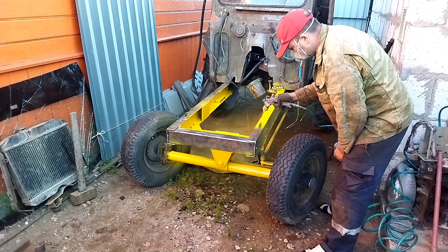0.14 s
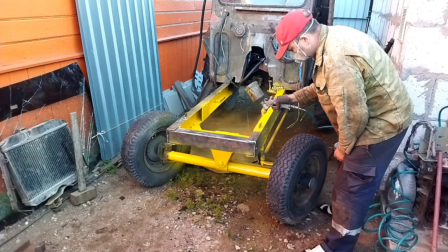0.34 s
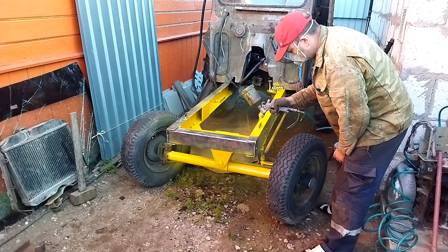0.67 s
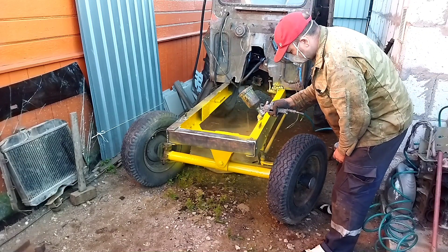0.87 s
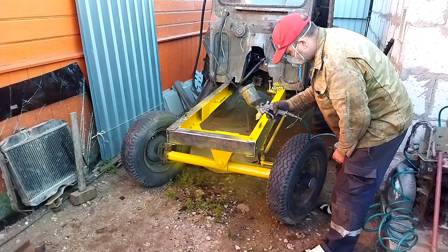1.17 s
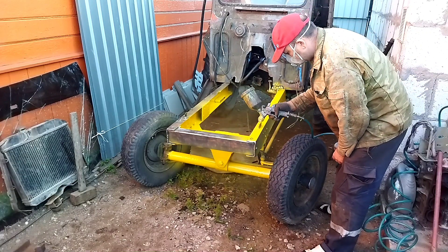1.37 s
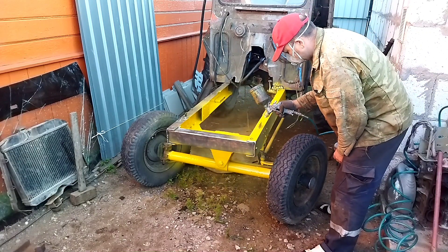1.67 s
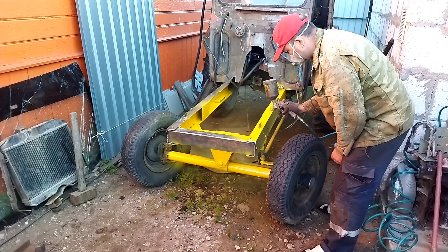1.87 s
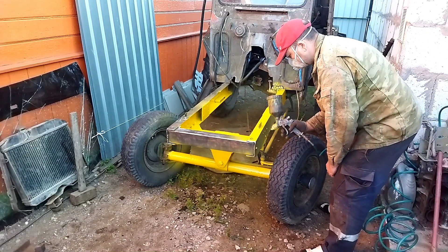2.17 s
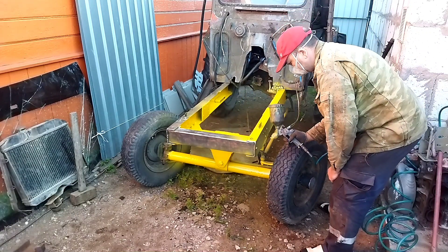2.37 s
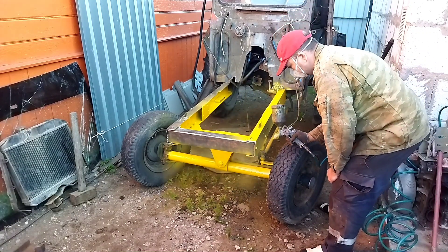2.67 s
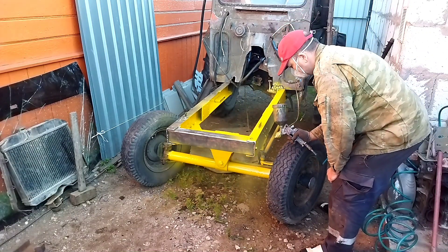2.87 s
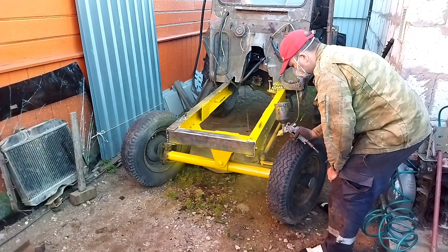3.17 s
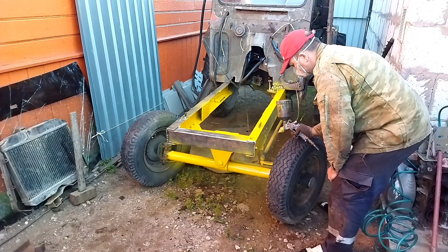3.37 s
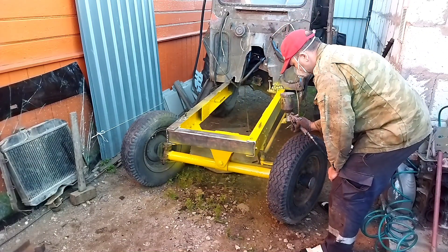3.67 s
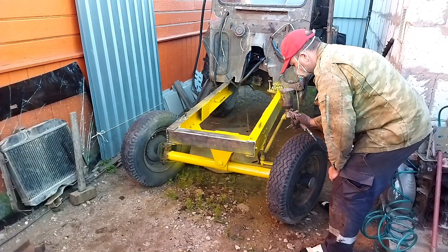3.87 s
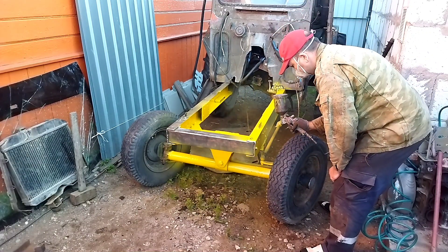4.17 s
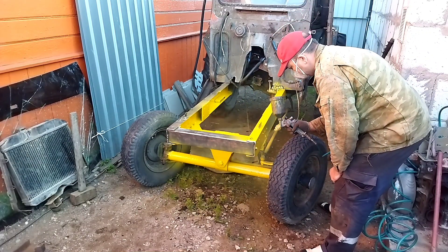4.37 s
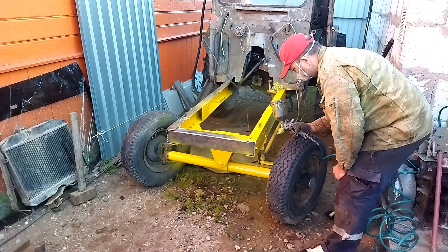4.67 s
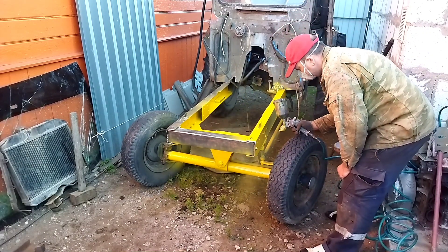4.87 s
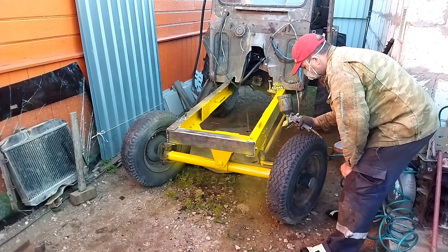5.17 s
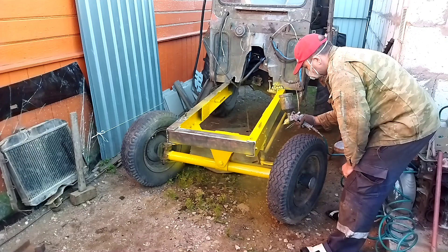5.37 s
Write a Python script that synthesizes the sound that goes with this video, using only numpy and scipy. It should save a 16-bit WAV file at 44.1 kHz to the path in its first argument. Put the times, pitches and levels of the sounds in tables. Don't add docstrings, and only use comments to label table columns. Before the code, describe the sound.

A paint spray gun hisses in sharp on-off bursts against a hollow steel frame, while a piston compressor jolts on and hums beneath.

```python
import sys
import numpy as np
from scipy import signal
from scipy.fft import rfft, irfft, dct, next_fast_len
from scipy.io import wavfile
from scipy.ndimage import uniform_filter1d, map_coordinates

SR = 44100
rng = np.random.default_rng(int(sys.argv[2]) if len(sys.argv) > 2 else 0)


def transcribe(signal):
    frames = np.atleast_2d(signal).T
    limited = np.clip(frames, -1, 1)
    pcm = np.round(limited * 32767).astype(np.int16)
    wavfile.write(sys.argv[1], SR, pcm)


def natural_amplitude(level_db):
    exponent = np.asarray(level_db, float) / 20
    return 10 ** exponent


N = 243873
RUN_HZ = 45.17

# open t/s, shut t/s, snap/0-1, settled flow level/dB, extra level at opening/dB
TRIGGER_PULLS = [
    (-1, 1.133, 1, -22.4, 0),
    (1.326, 1.856, .8, -23.3, 4),
    (2.316, 3.7, 1, -24.8, 5.7),
    (3.863, 4.453, .85, -19, -5.3),
    (4.627, 7, 1, -25.5, 7),
]
# t/s, aim level/dB
FRAME_AIM = [(0, 3), (.3, -3), (.65, 3.5), (1.0, 2.5), (1.12, -5), (1.38, -13), (1.45, -1), (1.68, 4),
             (1.86, 4), (2.4, -3), (5.53, -3)]
# f/Hz, level per Hz/dB
NOZZLE_FIZZ = [(6000, -60), (7000, -24), (8000, -14), (9000, -3.5), (11000, -4), (11350, -9), (11550, -9),
               (11700, 1), (12500, -1), (14500, -3), (15600, 0), (15800, -3), (16200, -60)]
# f/Hz, level per Hz/dB
JET_BODY = [(300, -30), (800, -12), (1300, -7.3), (2000, -5.2), (2600, -5.2), (3300, -1.5), (4500, -2),
            (5600, -1), (6800, 1), (7200, -3), (8000, -1), (9000, -30)]
# f/Hz, level per Hz/dB
STEEL_FRAME = [(24, -63), (40, -33), (97, -11), (162, -10), (271, 0), (314, -7), (374, -1), (1000, -5),
               (1300, -35), (2200, -120)]
# f/Hz, likeness/-1 to 1
JET_ALIKE = [(100, .9), (600, .3), (1200, .05), (1700, .55), (3500, .35), (5500, .42), (7500, .15),
             (9500, .52), (15000, .55)]
# f/Hz, lag/rad
JET_LAG = [(100, 0), (1700, .6), (3300, 1.6), (4800, 2.9), (7000, 3.1), (7900, 0), (16000, 0)]
# f/Hz, level/dB
JET_PAN = [(300, -1), (2000, 0), (5000, 2.6), (8000, 2.5), (15000, .6)]
# t/s, shaft f/Hz, load level/dB
SHAFT_RUN_UP = [
    (1.95, 22, -26),
    (2.05, 31, -17),
    (2.13, 40, -15),
    (2.18, 44, -6),
    (2.27, 46.8, -2),
    (2.34, 45.5, -2),
    (2.42, 45.15, 0),
    (5.53, 45.18, 0),
]
# multiple of shaft speed/1, level/dB, left minus right level/dB, left lag/rad
STROKE_TONES = [(1.0, -85.0, -1.0, 0.1), (2.0, -61.0, 0.0, 0.0), (3.0, -69.0, 2.0, -0.1),
                (4.0, -58.0, 0.0, 0.1), (5.0, -54.0, -1.0, 1.3), (6.0, -61.0, 0.0, 0.2),
                (7.0, -49.0, -2.0, 1.7), (8.0, -47.0, 0.0, 0.7), (9.0, -54.0, 4.0, 0.9),
                (10.0, -56.0, -10.0, 2.0), (11.0, -64.0, -9.0, 1.1), (12.0, -51.0, 6.0, 2.5),
                (13.0, -50.0, -8.0, 2.0), (14.0, -60.0, 0.0, 2.3), (15.0, -63.0, -4.0, 1.8),
                (16.0, -66.0, -4.0, 3.3), (17.0, -59.0, -11.0, 3.1), (18.0, -58.0, -7.0, 0.2),
                (19.0, -72.0, -4.0, 1.5), (20.0, -68.0, -2.0, 1.7), (32.0, -63.0, -1.0, 5.2),
                (40.0, -59.0, -2.0, 0.3)]
# f/Hz, level per Hz/dB
VALVE_CLATTER = [(30, -24), (70, -14), (150, -3), (400, 0), (800, -7), (1100, -11), (1400, -8), (1800, -8),
                 (2700, -18), (4000, -19), (5500, -24), (15000, -28), (15700, -36)]
# t/s, level/dB, f/Hz, time to fall 60 dB/s
RUN_UP_TONES = [(2.04, -51, 600, .08), (2.05, -52, 700, .07), (2.058, -50, 410, .07),
                (2.088, -52, 420, .06), (2.105, -56, 820, .07), (2.13, -47, 612, .15),
                (2.14, -46, 524, .8), (2.145, -47, 420, .4), (2.215, -43, 395, .2), (2.29, -47, 560, .15),
                (2.26, -45, 405, .2)]
# f/Hz, time to fall 60 dB/s
WALL_RINGING = [(200, .35), (2000, .33), (10000, .29)]
# f/Hz, level per Hz/dB
YARD_NOISE = [(30, -40), (80, -11), (140, -2), (270, 0), (600, -7.5), (1500, -10.5), (4000, -15),
              (6000, -19), (12000, -18), (14500, -21), (15700, -32)]
# f/Hz, rounding step over band level/dB
PHONE_COARSENESS = [(300, -12), (1500, -1), (3000, 6.8), (4200, 8), (5000, 9.4), (6000, 8.2), (7200, 9.2),
                    (8700, 6.3), (9500, 9), (15700, 9.5)]


def gun():
    usual_db, muffle = -22, .25
    fizz_db = flow() + .35 * wobble(7)
    aim_db, = curves(FRAME_AIM)
    body_db = -36.9 + .5 * (fizz_db - usual_db) - muffle * aim_db - .6 * np.arange(N) / SR
    drum_db = -51 + aim_db + 1.5 * wobble(25)
    flutter_db = .7 * wobble(18) + .6 * wobble(90) + .9 * wobble(500)

    fizz = natural_amplitude(fizz_db + 3.3 + flutter_db) * valve(1500, 320)
    fizz = fizz * rush(NOZZLE_FIZZ, JET_ALIKE, patchy_db=1.5)
    body = natural_amplitude(body_db + 5 + .7 * flutter_db) * valve(1150, 370)
    body = body * rush(JET_BODY, JET_ALIKE, patchy_db=1.5)
    drum = natural_amplitude(drum_db) * valve(600, 500)
    drum = drum * rush(STEEL_FRAME + [(1600, -60)], JET_ALIKE, patchy_db=2.5)
    return filtered(fizz + body + drum, lambda hz: ports(along(JET_PAN, hz), along(JET_LAG, hz)))


def flow():
    t = np.arange(N) / SR
    settle_s = .55
    opened, _, _, settled_db, surge_db = np.transpose(TRIGGER_PULLS)
    pull = np.searchsorted(opened[1:] - .05, t)
    since = np.maximum(t - opened[pull], 0)
    return settled_db[pull] + surge_db[pull] * np.exp(-since / settle_s)


def valve(open_db_s, shut_db_s):
    t = np.arange(N) / SR
    crack_db, steeper = -25, 5
    pulls = []
    for opened, shut, snap, *_ in TRIGGER_PULLS:
        rise_db = snap * open_db_s * (t - opened)
        rise_db = rise_db + steeper * np.minimum(rise_db - crack_db, 0)
        bleed_db = shut_db_s * (shut - t)
        pulls.append(np.minimum(0, np.minimum(rise_db, bleed_db)))
    return natural_amplitude(np.max(pulls, axis=0))


def compressor():
    switch_s, whine_grows_s = 2.05, .28
    shaft_hz, load_db = curves(SHAFT_RUN_UP)
    turns = np.cumsum(shaft_hz * (1 + .002 * wobble(6))) / SR + .75

    strokes = np.flatnonzero(np.diff(np.floor(turns)))
    late = (turns[strokes + 1] % 1) * SR / shaft_hz[strokes]
    uneven_db = .7 * rng.standard_normal(size=400)[:len(strokes)]
    size = natural_amplitude(load_db[strokes] + .9 + uneven_db) * SR / RUN_HZ / np.sqrt(2)
    train = np.bincount(strokes, size * late, N) + np.bincount(strokes + 1, size * (1 - late), N)

    whine_db = -30 * np.exp(-(np.arange(N) / SR - switch_s) / whine_grows_s).clip(0, 3)
    whine = 0
    for multiple, db, pan_db, lag in STROKE_TONES[-2:]:
        sides_db = np.array([[pan_db / 2], [-pan_db / 2]])
        level = natural_amplitude(whine_db + db + 4.5 + 1.5 * wobble(8) + sides_db)
        whine = whine + level * np.sin(2 * np.pi * multiple * turns + [[-lag / 2], [lag / 2]])

    beat = natural_amplitude(2.5 * np.cos(2 * np.pi * turns - 1.5) + 1.5 * np.cos(2 * 2 * np.pi * turns))
    alike = [(35, .7), (90, .93), (300, .4), (700, -.2), (2000, .2), (9000, .5)]
    clatter = natural_amplitude(load_db + .26 * whine_db - 48.5) * beat * rush(VALVE_CLATTER, alike, patchy_db=2.5)
    return filtered(train, thump_path) + clatter + whine


def thump_path(hz):
    order, db, pan_db, lag = np.transpose(STROKE_TONES[:-2])
    knots = np.r_[0, order, order[-1] + 3]

    def at(values, ends):
        return np.interp(hz / RUN_HZ, knots, np.r_[ends, values, ends])

    cep = irfft(np.log(natural_amplitude(at(db, -100))))
    cep[1:len(cep) // 2] *= 2
    cep[len(cep) // 2 + 1:] = 0
    smear = .38 * (np.minimum(hz / RUN_HZ, order[-1]) - 8) ** 2
    return np.exp(rfft(cep) - 1j * smear) * ports(at(pan_db, 0), at(lag, 0))


def start_up():
    squeal_s, hold_s = 2.02, .11
    since = np.arange(N) / SR - squeal_s
    squeal_hz = 1655 + 550 * np.maximum(since, 0) + 15 * wobble(40)
    fade_db = np.minimum(0, np.minimum(130 * since, 420 * (hold_s - since)))
    out = natural_amplitude(-67 + fade_db + 3 + 1.5 * wobble(30)) * np.sin(2 * np.pi * np.cumsum(squeal_hz) / SR)

    t = np.arange(SR // 2) / SR
    for s, knock_db, ring_hz, t60 in RUN_UP_TONES:
        swell = 1 - np.exp(-t / .003)
        ring = natural_amplitude(knock_db - 60 * t / t60) * swell * np.sin(2 * np.pi * ring_hz * t)
        out[round(s * SR):][:len(t)] += ring
    return out * natural_amplitude(np.array([[.6], [-.6]]))


def walls(x):
    hz, t, z = signal.stft(rng.standard_normal((2, SR // 2)), SR, nperseg=256)
    fade = natural_amplitude(-60 * t / along(WALL_RINGING, hz)[:, None])
    tail = signal.istft(z * fade, SR, nperseg=256)[1]
    late = np.pad(x, ((0, 0), (500, 0)))
    return signal.fftconvolve(late, tail / np.linalg.norm(tail[0]), axes=1)[:, :N]


def far_yard():
    alike = [(35, .6), (80, .9), (500, .4), (5000, .3)]
    return natural_amplitude(-61 + 1.5 * wobble(5)) * rush(YARD_NOISE, alike, patchy_db=2.5)


def rush(spectrum, alike, patchy_db):
    z = signal.stft(rng.standard_normal((2, N)), nperseg=512)[2]
    field = uniform_filter1d(rng.standard_normal(z.shape[1:]), size=6, axis=0)
    field = uniform_filter1d(field, size=10, axis=1)
    pair = signal.istft(z * natural_amplitude(patchy_db * unit(field)), nperseg=512)[1][:, :N]

    def middle_and_side(hz):
        turn = np.arccos(np.clip(along(alike, hz), -1, 1)) / 2
        return natural_amplitude(along(spectrum, hz)) * [np.cos(turn), np.sin(turn)]

    mid, side = filtered(pair, middle_and_side)
    return unit(np.array([mid + side, mid - side]))


def ports(pan_db, lag):
    half = natural_amplitude(pan_db / 2) * np.exp(-.5j * lag)
    return np.array([half, 1 / half])


def filtered(x, response):
    m = next_fast_len(N + SR // 2)
    return irfft(rfft(x, m) * response(np.fft.rfftfreq(m, 1 / SR)), m)[..., :N]


def wobble(rate):
    return map_coordinates(rng.standard_normal(size=4096), [np.arange(N) * rate / SR])


def curves(rows):
    s, *cols = np.transpose(rows)
    return [np.interp(np.arange(N) / SR, s, c) for c in cols]


def along(points, hz):
    f, v = np.transpose(points)
    return np.interp(np.log(hz + 1), np.log(f + 1), v)


def unit(x):
    return x / np.sqrt(np.mean(x ** 2) + 1e-20)


def scene():
    jet = gun()
    return jet + natural_amplitude(-16) * walls(jet) + compressor() + start_up() + far_yard()


def phone_thinning(x, size=1024, count=16):
    pair = np.array([x[0] + x[1], x[0] - x[1]]) / 2
    blocks = np.pad(pair, ((0, 0), (size, 2 * size - N % size))).reshape(2, -1, size)
    window = np.sin(np.pi * (np.arange(2 * size) + .5) / (2 * size))
    frames = np.concatenate([blocks[:, :-1], blocks[:, 1:]], 2) * window
    a, b, c, d = np.split(frames, 4, axis=2)
    lines = dct(np.concatenate([-c[..., ::-1] - d, a - b[..., ::-1]], 2), 4, norm="ortho")
    bands = lines.reshape(2, -1, size // count, count)
    hz = (np.arange(size // count) + .5) * count * SR / (2 * size)
    rms = np.sqrt(np.mean(bands ** 2, axis=3) + 1e-14)
    rms[1] = rms.max(axis=0)

    luck = rng.standard_normal(rms.shape)
    luck[0] = 1.15 * unit(uniform_filter1d(luck[0], size=2, axis=0))
    patches = uniform_filter1d(uniform_filter1d(luck[1], size=2, axis=0), size=2, axis=1)
    luck[1] = 3.4 * unit(patches) - 1.5
    luck[1] += along([(8000, -1.5), (9500, 1.3)], hz)

    power = np.sum(blocks ** 2, axis=(0, 2)) + 1e-12
    attack = power[1:] > 5 * power[:-1]
    quiet = power[1:] < .02 * power.mean()
    bass = uniform_filter1d(np.mean(rms[0, :, :2] ** 2, axis=1), size=9)
    hum = bass > .6 * bass.mean()

    step_db = along(PHONE_COARSENESS, hz) + 1.3 * luck
    step_db = step_db - 28 * attack[:, None] + .7 * hum[:, None] - 1.5 * quiet[:, None]
    step = (rms * natural_amplitude(step_db))[..., None]
    kept = (np.sign(bands) * np.floor(np.abs(bands) / step + .4) * step).reshape(lines.shape)
    below_top = np.arange(size) * SR / (2 * size) < 15740
    kept = kept * below_top * natural_amplitude(-1.2 * attack[:, None])

    p, q = np.split(dct(kept, 4, norm="ortho"), 2, axis=2)
    frames = np.concatenate([q, -q[..., ::-1], -p[..., ::-1], -p], 2) * window
    mid, side = (frames[:, 1:, :size] + frames[:, :-1, size:]).reshape(2, -1)[:, :N]
    return np.array([mid + side, mid - side])


def low_pass(x):
    return signal.sosfilt(signal.butter(12, 17070, fs=SR, output="sos"), x)


def record(dry):
    left_tilt = [(6000, .1), (8500, 1), (15000, 1.5)]  # f/Hz, left minus right level/dB
    tilted = filtered(phone_thinning(dry), lambda hz: ports(along(left_tilt, hz), 0))
    return low_pass(tilted)


dry = scene()
out = record(dry)
transcribe(out)
```